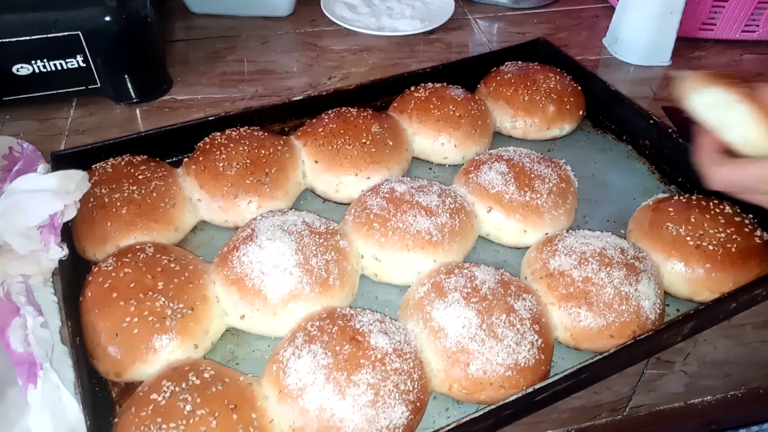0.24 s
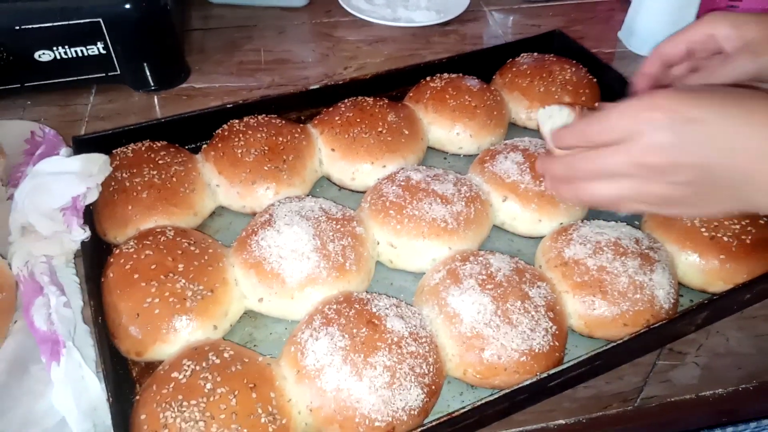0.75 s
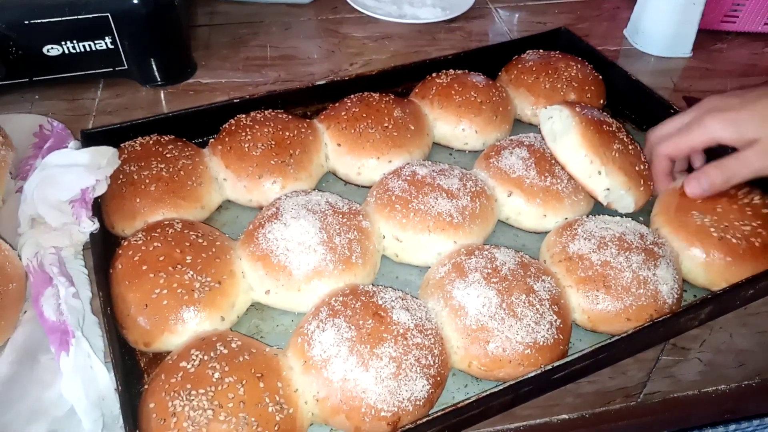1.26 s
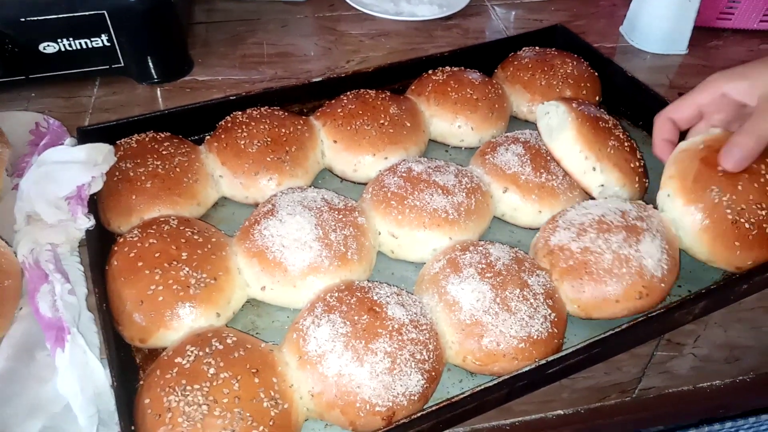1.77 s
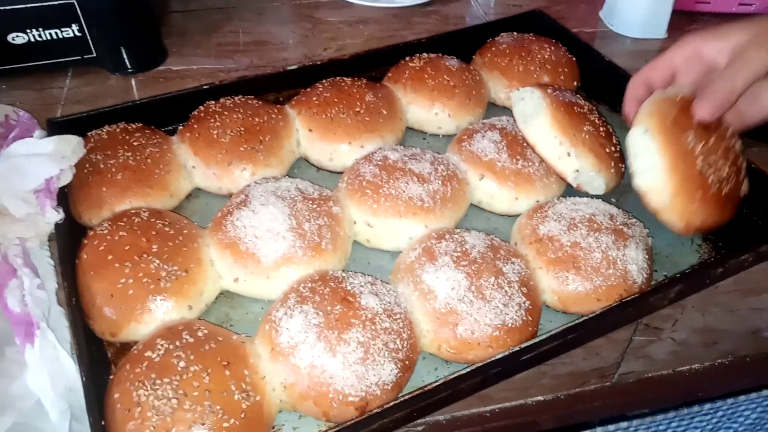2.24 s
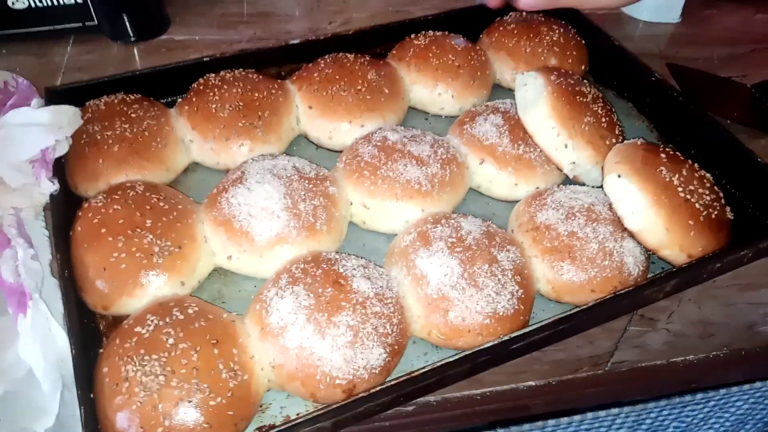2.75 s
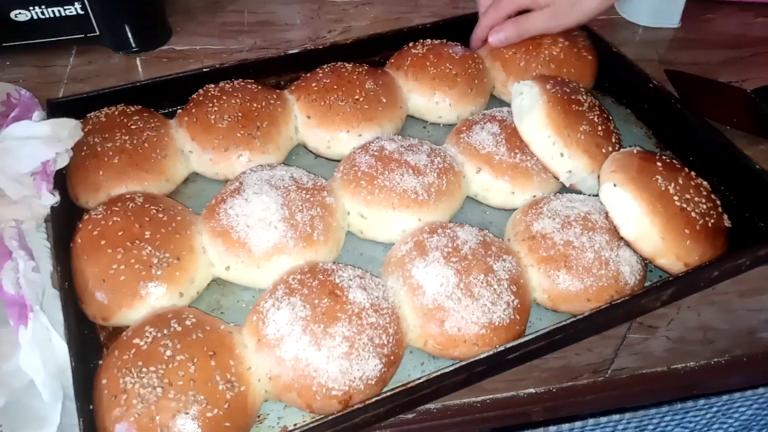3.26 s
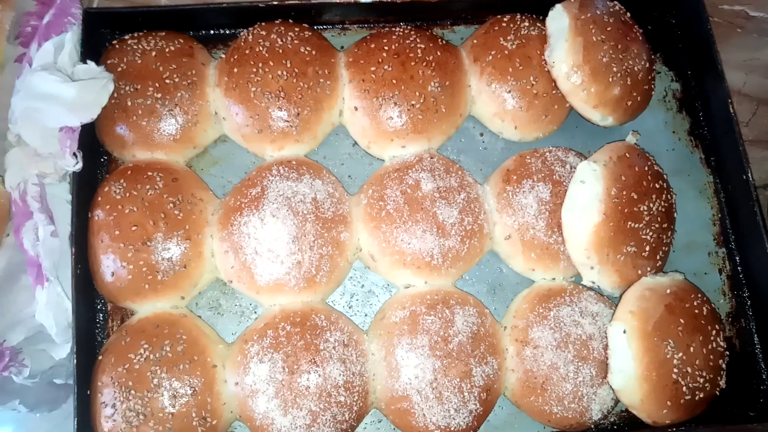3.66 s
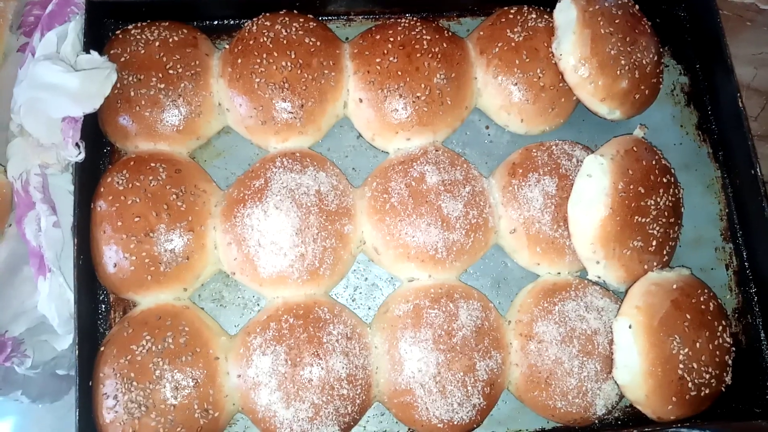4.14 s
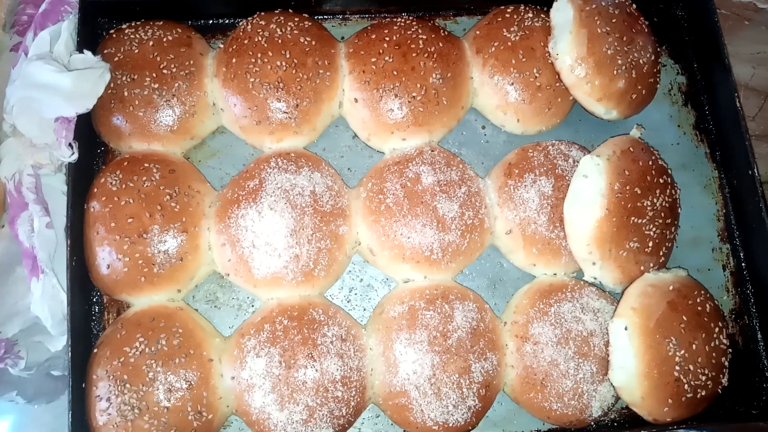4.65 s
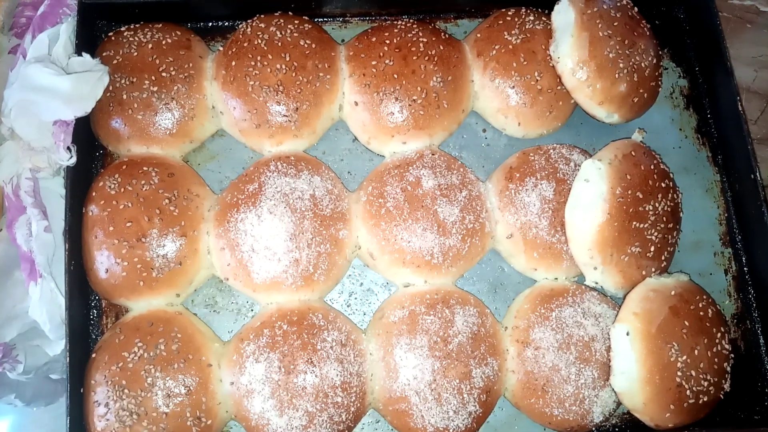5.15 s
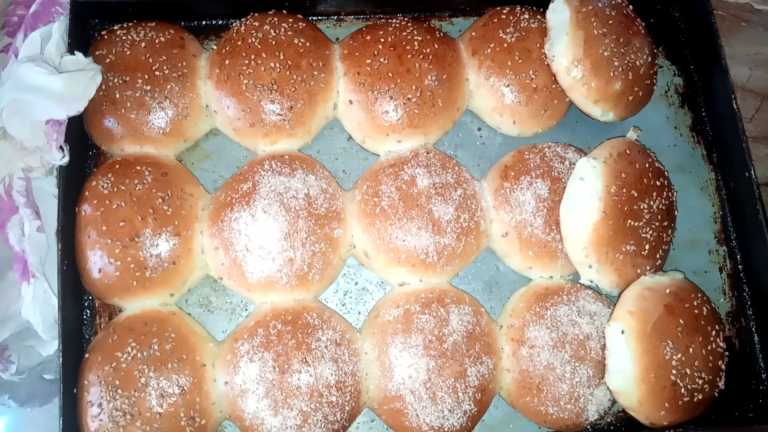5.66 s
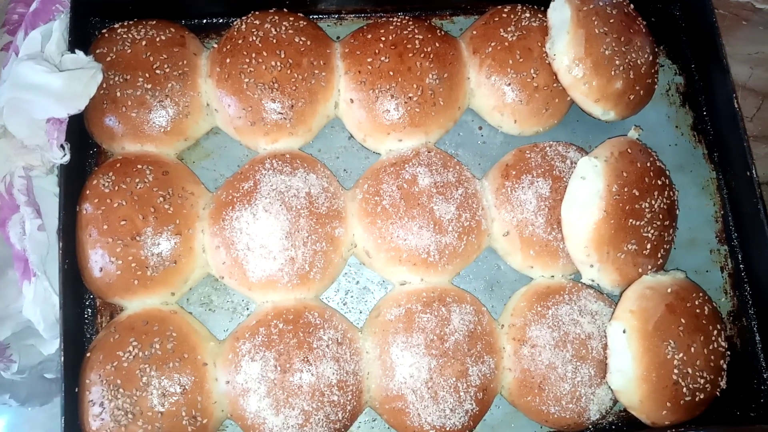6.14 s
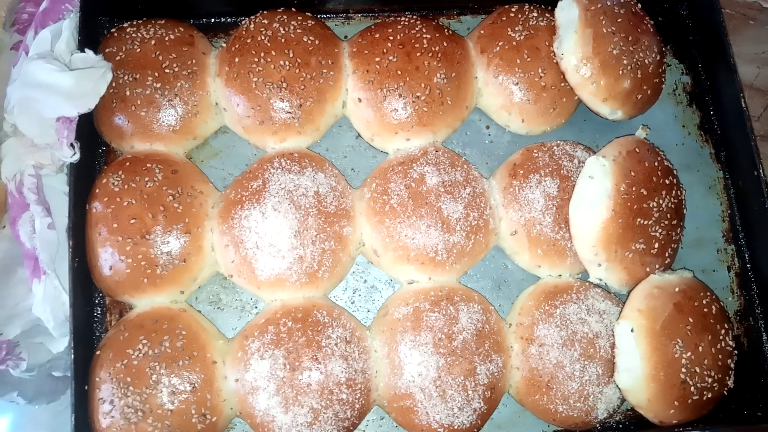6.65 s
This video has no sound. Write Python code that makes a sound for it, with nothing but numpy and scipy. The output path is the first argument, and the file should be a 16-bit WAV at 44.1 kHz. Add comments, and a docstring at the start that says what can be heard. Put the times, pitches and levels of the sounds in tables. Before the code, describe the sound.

Buns scrape and knock on a steel baking tray with sharp clacks, then the handling stops and birds chirp while distant roosters crow outdoors.

```python
"""Throughout: kitchen air, a thin shimmering insect drone and a faint far low sound, as filtered noise.
From 0 s baked buns are lifted and set down on a steel baking tray: three sharp clacks in quick succession and
dull knocks as struck modes, rubbing crust as ringing grains; birds call as trembling whistles, a hum is a sine.
At 3.36 s time jumps: rubbing and hum stop, the tray rests, and distant roosters crow as rough harmonics.
At 6.82 s time jumps again: the hum is back and one more knock sounds while the near bird calls."""
import sys
import numpy as np
from scipy import signal
from scipy.fft import rfft, irfft
from scipy.io import wavfile

SR = 44100
rng = np.random.default_rng(int(sys.argv[2]) if len(sys.argv) > 2 else 0)


def master(y):
    """Save y as 16-bit WAV."""
    cut = np.clip(np.atleast_2d(y).T, -1, 1)
    pcm = np.round(cut * 32767)  # scale
    wavfile.write(sys.argv[1], SR, pcm.astype(np.int16))


N = 304290
T = np.arange(N) / SR
JUMP_S, RETURN_S = 3.358, 6.818
TOP_HZ = 15850


def undb(db):
    """Decibels to gain."""
    return 10 ** (np.asarray(db) / 20)


def unit(x):
    """Scale to rms 1."""
    return x / np.sqrt(np.mean(x ** 2))


def on_log(points, hz):
    """Read (Hz, value) points on a log-frequency axis."""
    f, value = np.transpose(points)
    return np.interp(np.log(hz + 1), np.log(f), value)


def shaped(x, gain):
    """Filter by a gain given as a function of frequency."""
    return irfft(rfft(x) * gain(np.fft.rfftfreq(len(x), 1 / SR)), len(x))


def coloured(x, points):
    """Filter x by (Hz, dB) points, then scale to rms 1."""
    return unit(shaped(x, lambda f: undb(on_log(points, f))))


def narrow(hz, width_hz):
    """Noise in one resonance, at rms 1."""
    return unit(shaped(rng.standard_normal(N), lambda f: 1 / (1 + (2 * (f - hz) / width_hz) ** 2)))


def walk(rate_hz, size=N):
    """Random line of spread about 1 that changes about rate_hz times a second."""
    knots = rng.standard_normal(size // 16 + 2)
    return 1.2 * np.interp(np.arange(size) / SR * rate_hz, np.arange(len(knots)), knots)


def fade(t, t60_s):
    """Exponential decay by 60 dB in t60_s."""
    return np.exp(-np.log(1000) * t / t60_s)


def envelope(start_s, length_s, attack_s, release_t60_s):
    """Rise from start_s, hold until length_s is over, then die away."""
    rise = np.clip((T - start_s) / attack_s, 0, 1)
    return rise * fade(np.maximum(T - start_s - length_s, 0), release_t60_s)


def ringing(x, t60_s):
    """Pass x through a decaying noise response: dense fixed resonances."""
    t = T[:SR // 2]
    return signal.fftconvolve(x, rng.standard_normal(len(t)) * fade(t, t60_s))[:N]


def add(out, s, x):
    """Mix x into out from time s on."""
    start = int(round(s * SR))
    x, start = x[max(-start, 0):], max(start, 0)
    out[start:start + len(x)] += x[:N - start]


# still air in the kitchen: (frequency [Hz], relative level [dB])
AIR_COLOUR = [(25, -13), (45, 2), (90, 2), (140, -3), (250, -7.5), (550, -6), (800, -9), (1300, -12),
              (2000, -10.5), (2600, -12), (3300, -4), (4200, -6), (5800, -13), (7400, -18.5), (8600, -27),
              (13500, -31.5), (15500, -24)]
AIR_DB = -73


def kitchen_air():
    """Coloured noise through two sets of room resonances that wax and wane slowly."""
    room = sum(ringing(rng.standard_normal(N), t60_s=0.13) * undb(2.6 * walk(3.01)) for _ in range(2))
    return coloured(room, AIR_COLOUR) * undb(AIR_DB)


# narrow bands of the drone: (frequency [Hz], width [Hz], mean level [dB])
INSECTS = [(3062, 220, -78.5), (4350, 58, -80.5), (5210, 40, -77.5), (5357, 14, -76.5), (5416, 15, -76),
           (6560, 140, -89.5), (7090, 69, -92.5), (7480, 100, -93), (10124, 32, -101)]


def insects():
    """Narrow noise bands, each shimmering in level on its own."""
    return sum(narrow(hz, width_hz) * undb(db + 2.5 * walk(5)) for hz, width_hz, db in INSECTS)


# resonances of the far low sound: (frequency [Hz], width [Hz], relative level [dB])
DISTANT = [(92, 29, -6.5), (256.2, 70, -2), (524, 61, -3)]
# its swells: (start [s], length [s], gain [dB])
SWELLS = [(3.72, 0.23, -80.5), (4.047, 0.1, -81), (4.347, 0.22, -73.5), (5.7, .18, -77.5),
          (6.15, .4, -78.5)]
SWELL_ATTACK_S, SWELL_RELEASE_T60_S, DISTANT_REST_DB = .08, 0.42, -89


def far_sound():
    """Low resonant noise that swells now and then above a constant floor."""
    swell = undb(DISTANT_REST_DB) + sum(
        undb(db) * envelope(s, length_s, SWELL_ATTACK_S, SWELL_RELEASE_T60_S) for s, length_s, db in SWELLS)
    return sum(narrow(hz, width_hz) * undb(db + 3 * walk(8)) for hz, width_hz, db in DISTANT) * swell


HUM_HZ, HUM_DB = 47, -73.5


def hum():
    """A sine beside the table with a slightly wavering level, silent between the two jumps."""
    heard = (T < JUMP_S) | (T > RETURN_S)
    return np.sqrt(2) * np.sin(2 * np.pi * HUM_HZ * T) * undb(HUM_DB + .4 * walk(2.2)) * heard


# the hand shifts a bun: (start [s], length [s], rubbing level [dB], bumping level [dB])
MOVES = [(0, 0.027, -57.5, -80), (0.127, 0.075, -60, -63), (0.242, 0.075, -66.5, -71),
         (0.471, .08, -65, -65), (.6, 0.46, -76, -77), (1.013, 0.022, -63, -60), (1.069, .16, -62.5, -71),
         (1.302, 0.034, -65.5, -78), (1.406, .1, -67, -73.5), (1.62, 0.11, -89, -75),
         (1.842, 0.065, -79.5, -61), (1.93, 0.2, -80, -61), (2.389, 0.11, -61.5, -60),
         (2.55, 0.18, -88, -75.5), (2.8, .11, -71.5, -80), (3.014, 0.076, -67.5, -65),
         (3.131, 0.24, -65.5, -81)]
MOVE_ATTACK_S, RUB_RELEASE_T60_S, BUMP_RELEASE_T60_S = 0.023, 0.4, 0.37
# rubbing spectrum: (frequency [Hz], relative level [dB])
RUB_COLOUR = [(100, -12), (300, -10), (700, -3.5), (1500, 6.5), (4000, 9.5), (7000, -2), (8700, -15.5),
              (13000, -30.5), (15500, -11.5)]
# resonances of the soft bumping: (frequency [Hz], width [Hz], relative level [dB])
BUMP_MODES = [(125, 42, 1), (240, 43, -4), (347.5, 110, -1)]
GRAINS_PER_S = 3000


def crust():
    """Each move of the hand makes crust catch and slip in tiny grains that ring the sheet, over soft bumping."""
    rubbing = sum(undb(db) * envelope(s, length_s, MOVE_ATTACK_S, RUB_RELEASE_T60_S)
                  for s, length_s, db, _ in MOVES)
    bumping = sum(undb(db) * envelope(s, length_s, MOVE_ATTACK_S, BUMP_RELEASE_T60_S)
                  for s, length_s, _, db in MOVES)
    slips = rng.random(N) < GRAINS_PER_S / SR
    grains = rng.standard_normal(N) * slips * undb(2 * rng.exponential(size=N))
    rub = coloured(ringing(grains, t60_s=0.045), RUB_COLOUR) * undb(2 * walk(45))
    bumps = unit(sum(narrow(hz, width_hz) * undb(db + 5.5 * walk(21.984)) for hz, width_hz, db in BUMP_MODES))
    return (rub * rubbing + bumps * bumping) * (T < JUMP_S)


# walls around the yard: (delay [s], level [dB])
ECHOES = [(.034, -15), (.118, -22.5)]


def yard(x, wet_db, t60_s):
    """Sound from outdoors arrives directly, off a few walls and as a diffuse tail."""
    t = T[:SR]
    tail = fade(t, t60_s) + 1.84 * fade(t, 0.11)  # near walls answer first and densely
    tail = tail * (1 - fade(t, 0.011))
    response = undb(wet_db) * unit(rng.standard_normal(SR) * tail) / np.sqrt(SR)
    response[0] += 1
    for s, db in ECHOES:
        response[int(s * SR)] += undb(db)
    return signal.fftconvolve(x, response / np.linalg.norm(response))


def whistle(hz, gain, hoarse, wet_db):
    """A near-sine voice that trembles in pitch and level, heard across the yard."""
    tremble, flutter = (walk(rate_hz, SR)[:len(hz)] for rate_hz in (900, 220))
    phase = 2 * np.pi * np.cumsum(hz * (1 + hoarse * tremble)) / SR
    voice = np.sqrt(2) * (np.sin(phase) + undb(-40) * np.sin(2 * phase))
    return yard(voice * gain * undb(2.2 * flutter), wet_db, t60_s=0.77)


# slurred notes of the near bird, a held whistle first: (crest time [s], rise time [s], relative level [dB])
CALL = [(.038, .024, 1.5), (.053, 0.00348, 3), (.089, .011, 4), (.103, .004, 0.5), (.131, .012, -3)]
CALL_S, CALL_HZ, CALL_SAG_HZ_PER_S = .16, 4998, 12300  # before each call's pitch ratio
CALL_DIP_SHARE, CALL_ONSET_S, NOTE_DROP_S = .27, .003, .005  # pitch dip between notes


def warble(notes):
    """Pitch and gain: each note lifts both to its crest and drops them quickly, while the whole run sinks."""
    t = T[:int(CALL_S * SR)]
    lifts = np.array([np.exp(-((t - s) / np.where(t < s, rise_s, NOTE_DROP_S)) ** 2) for s, rise_s, _ in notes])
    gain = np.max([undb(db) * lift ** 0.58 for lift, (_, _, db) in zip(lifts, notes)], axis=0)
    onset = 1 - np.exp(-t / CALL_ONSET_S)
    lift = np.where(t < notes[0][0], onset, lifts.max(axis=0))  # the first note holds its pitch
    return (CALL_HZ - CALL_SAG_HZ_PER_S * t) * (1 - CALL_DIP_SHARE * (1 - lift)), gain


def glide(points):
    """Pitch and gain of a chirp in one sweep."""
    s, hz, db = np.transpose(points)
    t = T[:int(s[-1] * SR)]
    return np.interp(t, s, hz), undb(np.interp(t, s, db))


# near bird: (start [s], level [dB], pitch ratio, level growth [dB/s], diffuse over direct [dB])
WARBLES = [(-.053, -43.5, .98, -20, -4.5), (2.283, -45, 1.0, -20, -4.5), (4.372, -45, 1.01, 45, -2),
           (5.172, -45.5, .985, -10, -4), (6.757, -42, .96, 0, -1)]
WARBLE_HOARSE_SHARE = .013  # of the pitch
# chirp sweeps: (time [s], pitch before ratio [Hz], relative level [dB])
ARCH = [(0, 3000, -17), (.025, 4190, -3.5), (.052, 4660, -5.5), (.072, 4054, -0.5), (.1, 3500, -3.5),
        (.125, 3130, -38)]
THIN = [(0, 6630, -16), (.025, 6400, 4.5), (.07, 6346, -7), (.125, 5900, -7.5), (.15, 5950, -9)]
RISE = [(0, 3106, -6), (.06, 3385, -3), (.11, 3864, 2), (.15, 4150, -9), (.19, 4146, -17.5)]
RASP = [(0, 4320, -3), (.04, 5000, -7.5), (.08, 4437, -3), (.13, 3496, 2), (.17, 2900, -12),
        (.2, 2566, -6.5)]
# other birds: (sweep, start [s], level [dB], pitch ratio, hoarseness [share of pitch], diffuse over direct [dB])
CHIRPS = [(THIN, 1.46, -60, 0.97, .02, 0), (THIN, 3.075, -60.5, 1.02, 0.025, 0),
          (RASP, 3.23, -52.5, 1.174, .14, 8), (RASP, 3.48, -54, 0.93, 0.083, 8.6),
          (THIN, 3.51, -66.5, 0.96, 0.043, 7), (RASP, 3.725, -54, 1, 0.079, 11),
          (THIN, 3.725, -62, 0.95, 0.04, 6.3), (THIN, 3.755, -68, 1.178, 0.022, 6),
          (THIN, 3.99, -67.5, 0.97, 0.045, 7), (RISE, 4.075, -51.5, 1, 0.032, 3),
          (THIN, 4.895, -59, 1.01, .022, 2), (ARCH, 5.262, -52.5, 1.01, 0.022, 0),
          (ARCH, 5.53, -50.5, 0.96, .018, 0), (ARCH, 5.812, -52, 1.02, .018, 0),
          (ARCH, 6.09, -51.5, 0.965, .018, 0), (THIN, 6.69, -62.5, 0.99, 0.028, 3.2)]


def birds():
    """The near bird's warbles and the others' chirps, each heard only within its own stretch of time."""
    heard = np.zeros((3, N))  # before, between and after the jumps

    def stretch(s):
        return np.searchsorted([JUMP_S, RETURN_S], s)

    hz, gain = warble(CALL)
    for start_s, db, ratio, growth_db_per_s, wet_db in WARBLES:
        effort = undb(db + growth_db_per_s * (T[:len(hz)] - CALL_S / 2))
        call = whistle(ratio * hz, gain * effort, WARBLE_HOARSE_SHARE, wet_db)
        add(heard[stretch(start_s + CALL_S)], start_s, call)
    for sweep, start_s, db, ratio, hoarse, wet_db in CHIRPS:
        hz, gain = glide(sweep)
        own = stretch(start_s + .75 * len(hz) / SR)
        add(heard[own], start_s, whistle(ratio * hz, gain * undb(db), hoarse, wet_db))
    return heard[stretch(T), np.arange(N)]


def modes(table, t):
    """Damped sines; every blow meets them in another proportion and phase."""
    return unit(sum(undb(db + rng.normal()) * np.sin(2 * np.pi * (hz * t + rng.random())) * fade(t, t60_s)
                    for hz, db, t60_s in table))


# rim modes of the tray: (frequency [Hz], relative level [dB], t60 [s])
RIM = [(1077, -9, 0.19), (1556, -14, 0.25), (1771, -20, 0.3), (2024, -16, 0.18), (2401, -8, 0.16),
       (2632, -15, 0.25), (2853, -8, 0.16), (3052, -6, 0.18), (3117, 0, 0.1), (3246, -17, 0.24),
       (3343, -18, 0.24), (3424, -13, 0.17), (3828, -5, 0.13), (4027, -4, 0.18), (4355, -3, 0.16),
       (4608, -20, 0.33), (4700, -12, 0.18), (4893, -12, 0.19), (5130, -10, 0.21), (5394, -11, 0.16),
       (5739, -7, 0.13), (5905, -9, 0.14), (6115, -14, 0.18), (6557, -17, 0.23), (6691, -18, 0.24),
       (7257, -8, 0.11)]
# dense ringing of sheet and kitchen: (frequency [Hz], t60 [s])
RING_T60 = [(100, 0.35), (400, 0.31), (1200, 0.21), (4000, 0.23), (8000, 0.2), (15000, 0.16)]


def blow(colour, low_hz, high_hz, rim_db, crack_db, crack_t60_s):
    """A tick and short crack, the rim's modes and a dense ring; the contact sets the band that is excited."""
    t = T[:SR]
    edges_hz = np.geomspace(50, SR / 2, 14)
    noise = rng.standard_normal(SR)
    ring = 0
    for a, b in zip(edges_hz, edges_hz[1:]):
        band = shaped(noise, lambda f: (f >= a) * (f < b))
        ring = ring + band * fade(t, on_log(RING_T60, np.sqrt(a * b)))
    crack = rng.standard_normal(SR) * fade(t, crack_t60_s)
    crack[0] = 7  # tick of first contact
    # colour doubled in dB: minimum_phase takes the root of the magnitude
    gain = undb(2 * on_log(colour, np.linspace(0, SR / 2, 513)))
    response = signal.minimum_phase(signal.firwin2(511, np.linspace(0, 1, 513), gain))
    sheet = unit(signal.lfilter(response, 1, unit(ring) + undb(crack_db) * unit(crack)))
    x = sheet + undb(rim_db) * modes(RIM, t)
    # a small hard contact hardly moves the lows, a soft one spares the highs
    for corner_hz in (low_hz, low_hz / 2):
        x = signal.sosfilt(signal.butter(1, corner_hz, "high", fs=SR, output="sos"), x)
    x = signal.sosfilt(signal.butter(2, min(high_hz, TOP_HZ), fs=SR, output="sos"), x)
    return x / np.sqrt(np.mean(x[:SR // 40] ** 2))  # rms 1 over the first 25 ms


# hard metal contacts: (time [s], level [dB], lowest [Hz], highest [Hz])
CLACKS = [(0.104, -27.5, 3600, 10800), (0.142, -28, 980, 4220), (0.1544, -35, 3000, 9200)]
# buns and fingers meeting the tray; the first row is a short ring already sounding at the very start: # (time
# [s], level before build-up [dB], lowest [Hz], highest [Hz], boom drive [dB], contact time [s])
KNOCKS = [(.001, -48.5, 1270, 3180, -69, 0.00083), (0.4478, -36.5, 247, 3030, -48, 0.00017),
          (.555, -69.5, 4000, 10900, -89, 0.001), (1.0176, -50, 280, 2620, -81, 0.0019),
          (1.074, -55, 400, 4000, -77, 0.0065), (1.108, -56, 500, 5760, -71, 0.0043),
          (1.185, -60.5, 500, 5000, -69.5, 0.0025), (1.218, -69, 245, 4000, -73, 0.0025),
          (1.411, -61, 1090, 3980, -79, 0.00084), (2.0546, -43, 224, 1850, -56, 0.00012),
          (2.377, -46.5, 898, 3010, -79, 0.0045), (2.391, -35, 310, 3700, -55, 0.00095),
          (2.623, -66.5, 4000, 12040, -85, 0.0012), (2.889, -56, 1910, 2300, -88, 0.0025),
          (3.015, -51, 810, 1630, -71, 0.00022), (6.819, -57.5, 89.5, 2500, -56.5, 0.001)]
# spectra of the blows: (frequency [Hz], relative level [dB])
CLACK_COLOUR = [(100, -15), (500, -11), (900, -8), (1200, 5), (1900, -5), (2900, -0.5), (5000, 1),
                (7000, 2.5), (8700, -12), (13000, -12.5), (15500, -1)]
KNOCK_COLOUR = [(60, -0.5), (200, 6), (450, 3), (750, 0.5), (1000, -3), (1700, 3.5), (2400, -1.5),
                (4500, -0.5), (7000, -1), (8700, -9), (13000, -9.5), (15500, 9.5)]
# modes of the wide tray floor: (frequency [Hz], relative level [dB], t60 [s])
BOOM = [(85.2, 3, 0.53), (97, -10.5, .35), (148, -4, 0.19), (226.2, -1.5, 0.26), (359.5, -11.5, 0.26)]


def tray():
    """Hard clacks ring the rim; soft knocks build up over their contact time and set the tray floor booming."""
    out, t = np.zeros(N), T[:SR]

    def boom():
        return modes(BOOM, t) * (1 - fade(t, 0.098)) / 4

    for s, db, low_hz, high_hz in CLACKS:
        clack = blow(CLACK_COLOUR, low_hz, high_hz, rim_db=-5, crack_db=-5.5, crack_t60_s=.015)
        add(out, s, undb(db) * clack + undb(db - 29) * boom())
    for s, db, low_hz, high_hz, boom_db, contact_s in KNOCKS:
        knock = blow(KNOCK_COLOUR, low_hz, high_hz, rim_db=-27.5, crack_db=2.5, crack_t60_s=0.047)
        knock = knock * (1 - np.exp(-t / contact_s))
        add(out, s, undb(db) * knock + undb(boom_db) * boom())
    return out


# a rooster's throat heard from afar: (frequency [Hz], relative level [dB])
THROAT = [(450, -32), (950, -11.5), (1300, 2), (1550, 3), (1900, 1.5), (2350, 5), (3000, -15.5),
          (4000, -28)]
BEAK_WIDTH_HZ = 510
BEAK_FOLLOW_POWER = .7  # the beak's resonance moves with this power of the pitch


def crow(length_s, first_hz, middle_hz, last_hz, beak_hz, rough):
    """One note: a wavering stack of harmonics on an arch of pitch, through the throat and open beak."""
    along = np.minimum(T[:SR] / length_s, 1)
    arch_hz = np.polyval(np.polyfit([0, .5, 1], [first_hz, middle_hz, last_hz], 2), along)
    hz = arch_hz * (1 + rough * walk(160, SR) + 0.005 * walk(20.04, SR))
    phase = 2 * np.pi * np.cumsum(hz) / SR
    beak = beak_hz * (arch_hz / first_hz) ** BEAK_FOLLOW_POWER
    gains = {k: undb(on_log(THROAT, k * hz)) / np.hypot(1, 2 * (k * hz - beak) / BEAK_WIDTH_HZ)
             for k in range(1, 7)}
    stack = sum(g * np.sin(k * phase) for k, g in gains.items())
    return stack / np.sqrt(sum(g ** 2 for g in gains.values()) / 2)


# notes of the crows: (start [s], length [s], first [Hz], middle [Hz], last [Hz], level [dB], fading [dB/s],
# beak resonance at the first pitch [Hz], roughness [share of pitch], diffuse over direct [dB])
CROWS = [(3.28, 0.35, 499, 468, 444, -51.5, 35, 1990, .019, 7.5),
         (3.64, 0.64, 493.3, 529.7, 518.4, -58.5, 7, 1580, .019, 7),
         (3.93, .45, 595, 576, 550.5, -60, 24, 1170, .04, 17),
         (4.33, .79, 493, 465, 390, -58.5, 14, 1880, .017, 5),
         (5.81, .08, 605, 660, 632, -69.5, 10, 1560, 0.062, 13),
         (6.08, .13, 670, 702, 695, -68, -20, 1760, .055, 18),
         (6.22, .25, 668, 657, 648, -63, 20, 1530, .045, 16)]
CROW_ATTACK_S, CROW_RELEASE_T60_S = 0.043, 0.25


def roosters():
    """One long crow in three notes, others from farther off; notes weaken, or grow where fading is negative."""
    out = np.zeros(N)
    for s, length_s, first_hz, middle_hz, last_hz, db, fading_db_per_s, beak_hz, rough, wet_db in CROWS:
        effort = envelope(0, length_s, CROW_ATTACK_S, CROW_RELEASE_T60_S)[:SR]
        effort = effort * undb(db - fading_db_per_s * T[:SR])
        note = crow(length_s, first_hz, middle_hz, last_hz, beak_hz, rough)
        add(out, s, yard(effort * note, wet_db, t60_s=0.95))
    return out * (T > JUMP_S)


def scene():
    """Tray and hands close by, the yard behind them."""
    background = kitchen_air() + insects() + far_sound() + hum()
    return (background + crust() + birds() + tray() + roosters())[None]


def record(dry):
    """A steep elliptic low-pass cuts everything above TOP_HZ."""
    return signal.sosfilt(signal.ellip(10, .2, 70, TOP_HZ, fs=SR, output="sos"), dry)


dry = scene()
out = record(dry)
master(out)
```